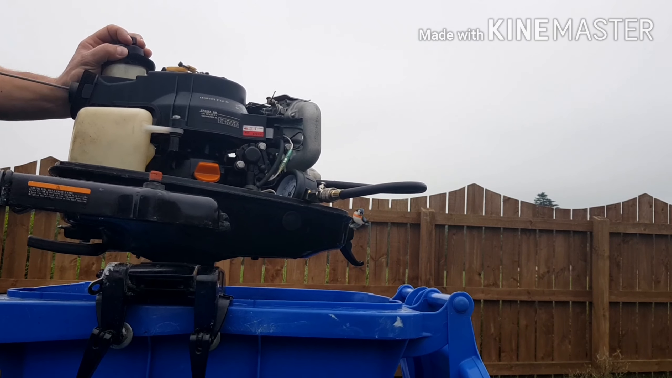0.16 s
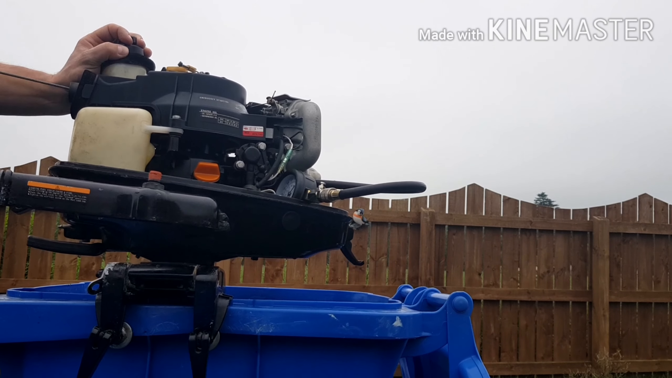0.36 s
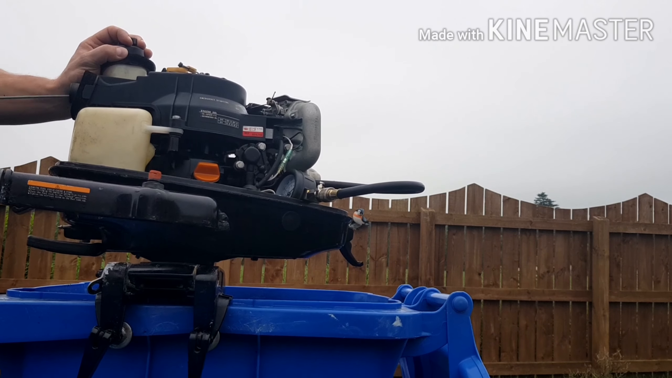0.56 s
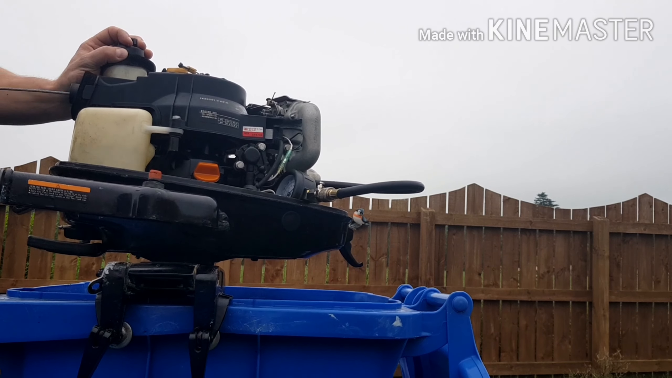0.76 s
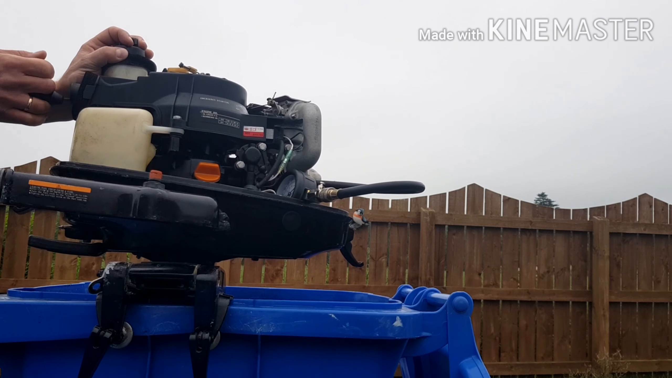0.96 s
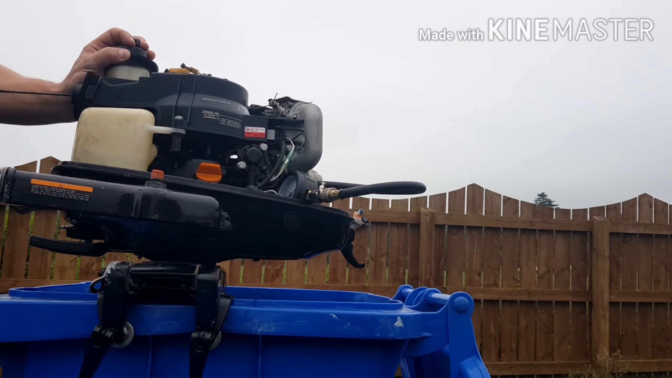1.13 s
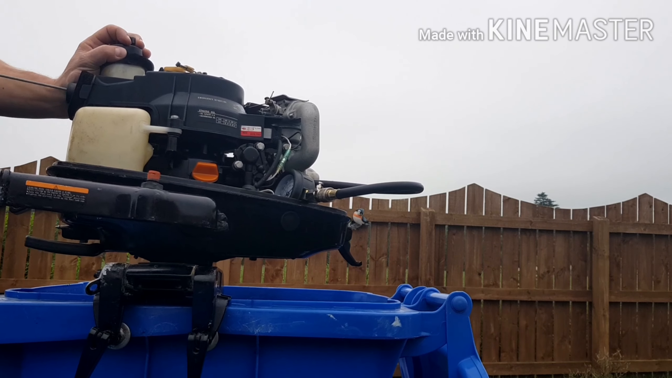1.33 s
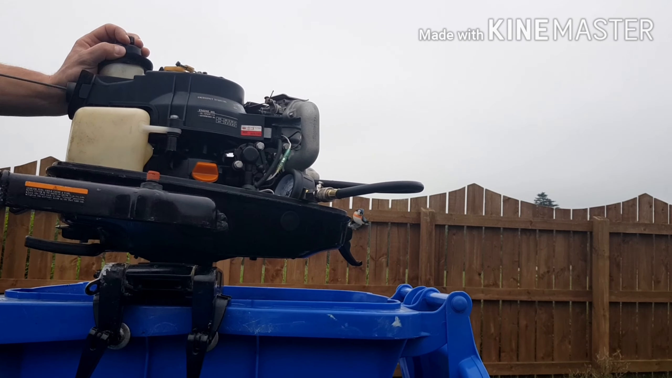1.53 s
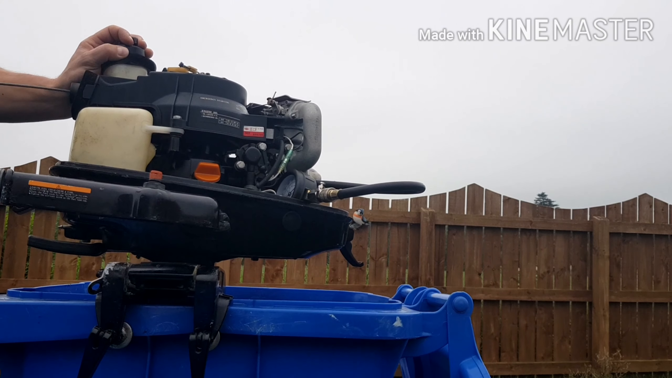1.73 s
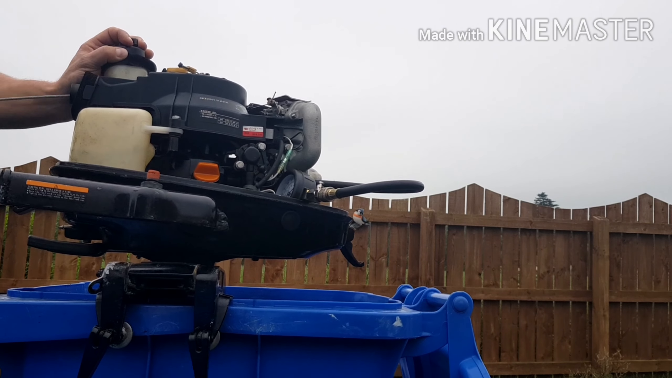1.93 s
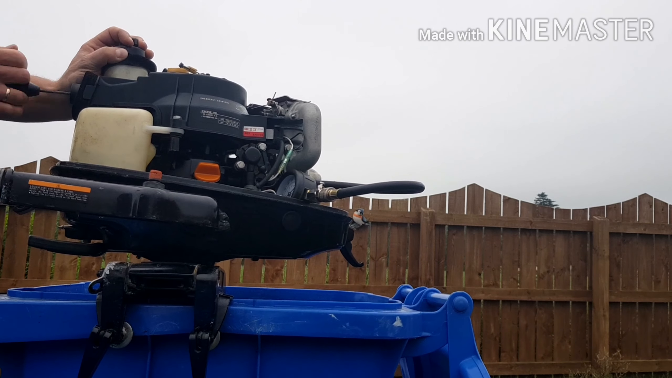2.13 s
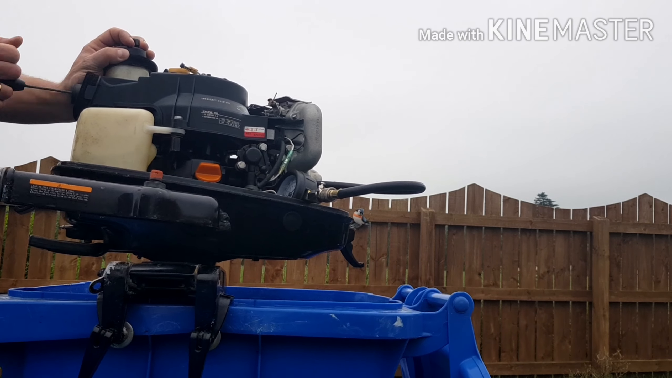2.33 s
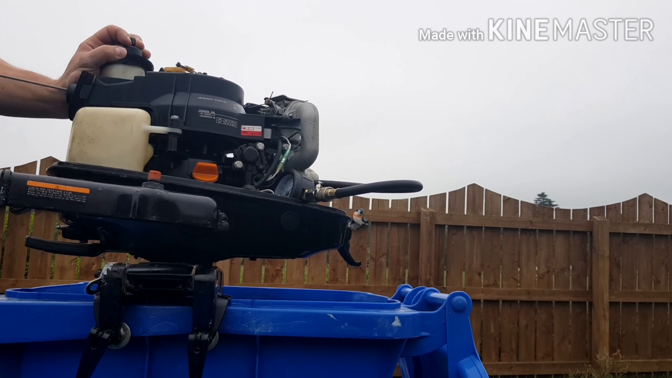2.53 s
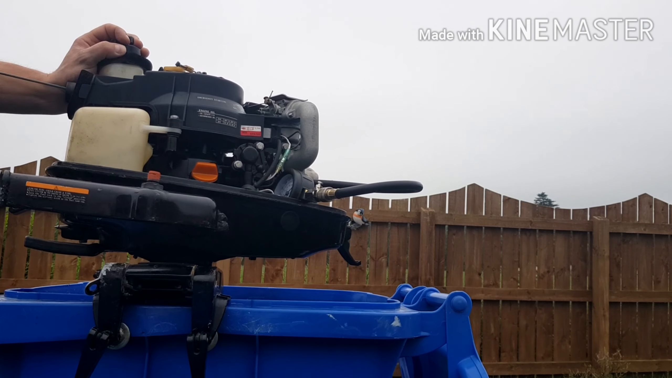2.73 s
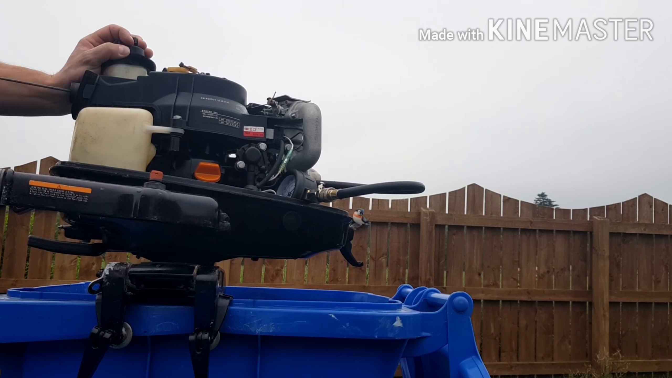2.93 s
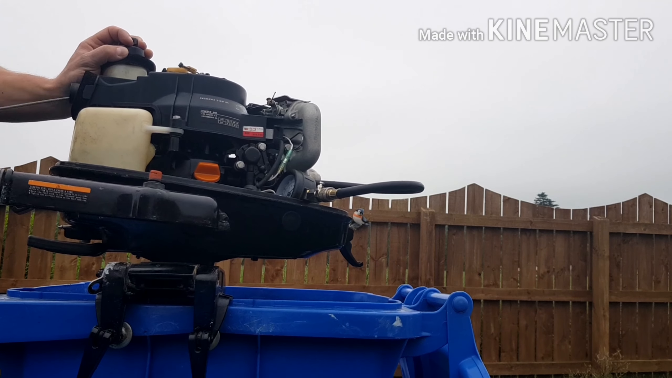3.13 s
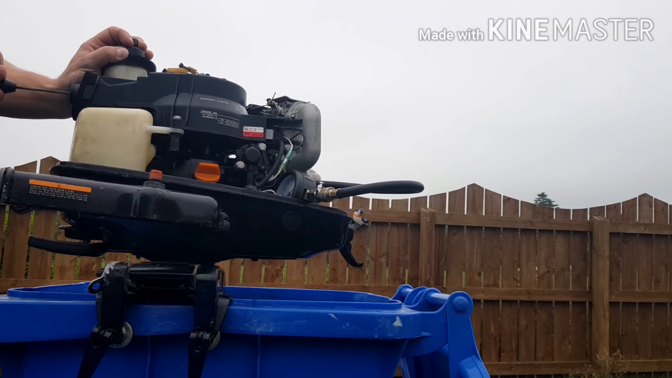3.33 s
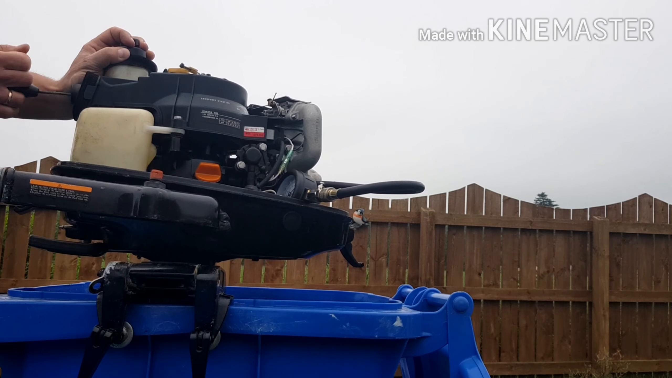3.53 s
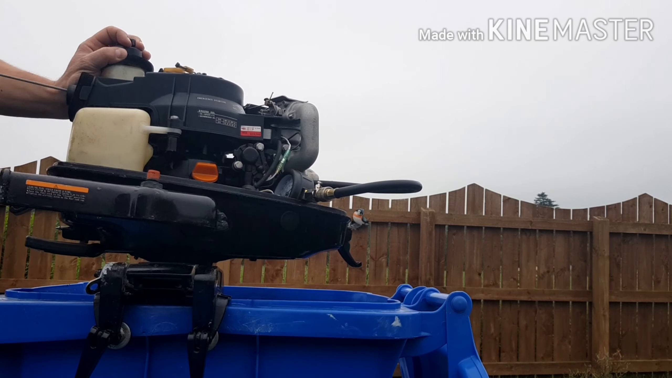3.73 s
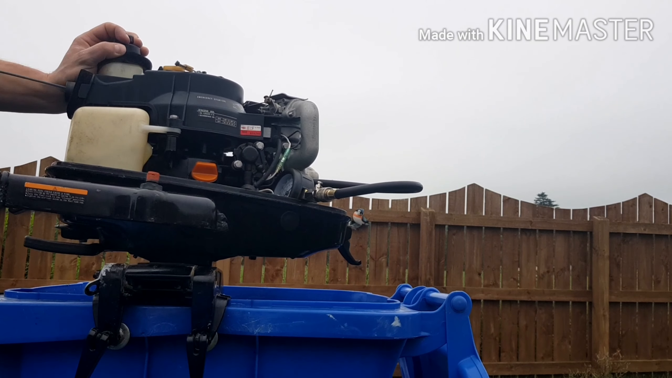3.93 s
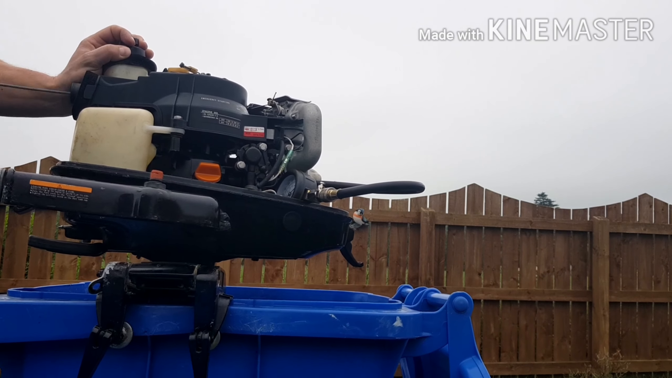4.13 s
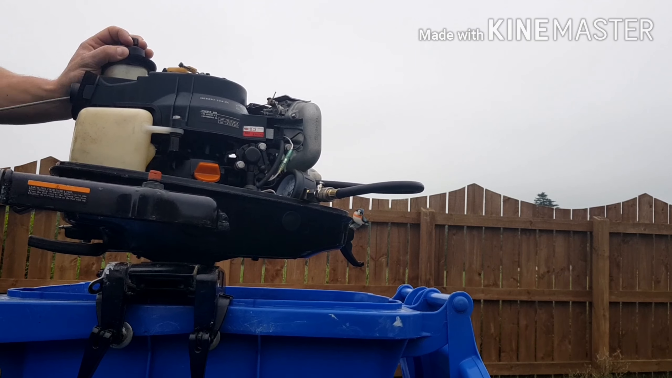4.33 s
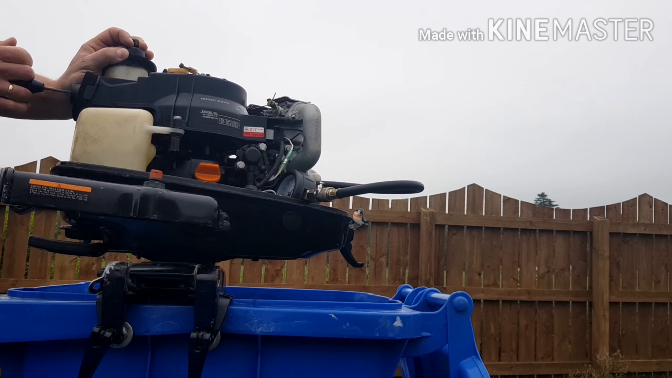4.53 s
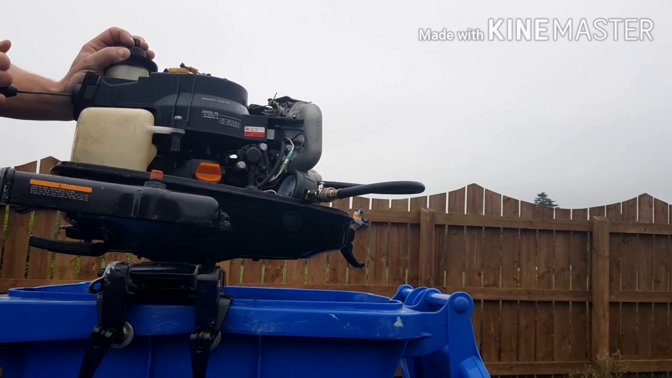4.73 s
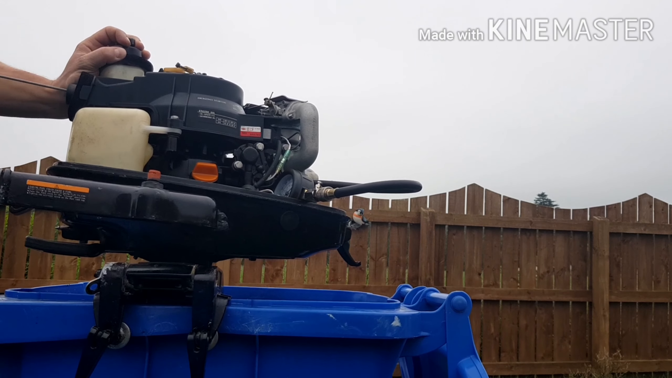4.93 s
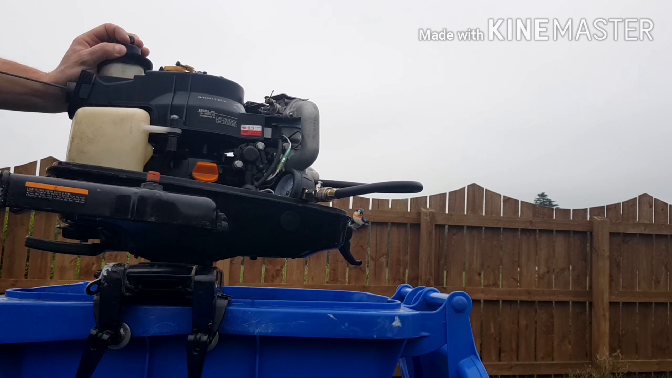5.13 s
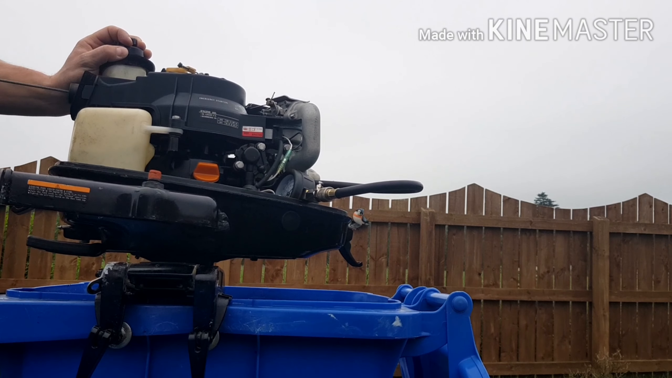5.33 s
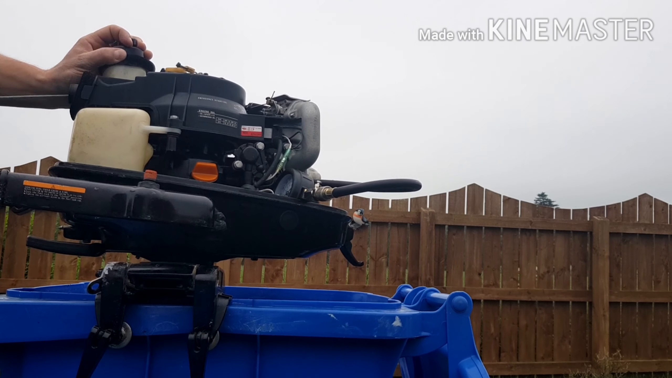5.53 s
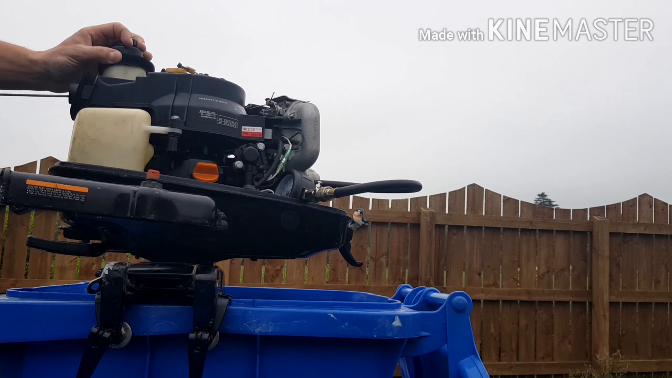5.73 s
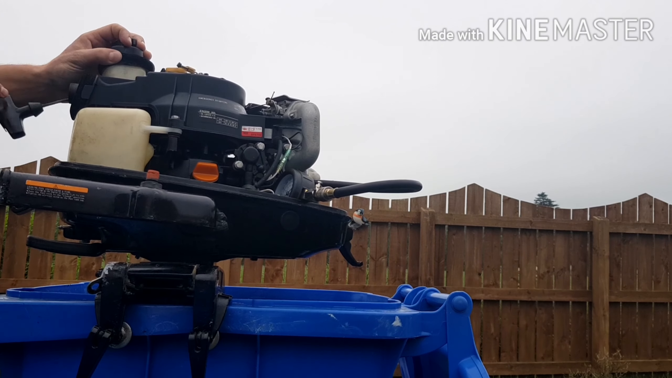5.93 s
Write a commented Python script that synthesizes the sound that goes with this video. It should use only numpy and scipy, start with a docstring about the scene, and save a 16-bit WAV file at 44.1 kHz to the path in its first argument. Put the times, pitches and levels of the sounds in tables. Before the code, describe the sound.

A small outboard engine is yanked over five times by its pull rope, clunking, puffing and rattling in a quiet garden, but never firing.

```python
"""A small outboard on a garden stand, heard close by on two microphone ports: five rope pulls, and it never fires.
In each pull the starter pawls catch with a clunk (dying modes and noise cracks), then the cylinder puffs twice
(falling thumps and air) while the reel rattles in its plastic housing (filtered noise). As the pull ends a
steel part pings (long modes), the rope winds back with a knock, and the reel coasts down. A far bird (gliding
whistles) calls before the fourth and fifth pulls; after the last, the rope slides slowly home (hiss)."""
import sys
import numpy as np
from scipy import signal
from scipy.fft import rfft, irfft
from scipy.io import wavfile
from scipy.ndimage import uniform_filter1d

SR = 44100
rng = np.random.default_rng(int(sys.argv[2]) if len(sys.argv) > 2 else 0)


def put_to_file(sound):
    """Save the sound as 16-bit audio at rate SR, in the file named by the first command-line argument."""
    columns = np.atleast_2d(sound).T  # one column per channel
    safe = np.clip(columns, -1, 1)
    whole_steps = np.round(safe * 32767)
    wavfile.write(sys.argv[1], SR, whole_steps.astype(np.int16))


N = 263714
TIME = np.arange(N) / SR  # [s]

# Event and mode levels are relative: each source sets its own gain.
# garden air around the stand: (frequency [Hz], level [dB])
GARDEN_SPECTRUM = [(20, -12.5), (50, 3.5), (110, -4), (250, -18), (600, -18), (1200, -26), (2500, -20.5),
                   (5000, -30.5), (9000, -40), (15000, -33.5)]
# a distant bird, one list a call: (time [s], pitch [Hz], level [dB])
BIRD_CALLS = [
    [(3.42, 3500, -76), (3.45, 3250, -69), (3.48, 2739, -62), (3.515, 2470, -55), (3.57, 2281, -59)],
    [(4.67, 2480, -93), (4.70, 2516, -68.5), (4.725, 2650, -56), (4.745, 2680, -70)],
]

# likeness of the two microphone ports: (frequency [Hz], likeness [0-1])
PORT_LIKENESS = [(25, .7), (100, 1), (500, 1), (1000, 0.75), (2000, 0.66), (5000, 0.11), (15000, 0.13)]
# left port against right port: (frequency [Hz], level difference [dB])
PORT_LEAN = [(60, 2.9), (400, 1.8), (1200, 3.5), (2400, 2.44), (4400, 1.35), (8000, 1.7), (10600, 7.4),
             (12000, 3.6), (14000, 10.6)]
LEFT_LEAD_MS = .17
BAND_EDGE_HZ = 15800

# resonances of the plastic housing, before the depth factor:
# (frequency [Hz], width [Hz], lift [dB], left-right difference [dB])
HOUSING_RESONANCES = [(638, 54, 12.5, -1), (893, 132, 14, -3.5), (1047, 82, 6, 1.5), (1257, 123, 15, -1.5),
                      (1645, 108, 6.5, 7), (1822, 260, 11.5, -6.5), (2194, 116, 7.5, -2),
                      (2637, 54, 4.5, 9), (3538, 165, 1.5, 13)]
# chatter of the reel: (frequency [Hz], level [dB])
RATTLE_SPECTRUM = [(60, -30.5), (200, 0.5), (330, -3.5), (500, 3.5), (770, -4), (1400, -1), (2200, -6),
                   (3200, -3.5), (4500, -14), (9000, -24.5), (16000, -60.5)]
# drone of the coasting reel through the shell: (frequency [Hz], level [dB])
DRONE_SPECTRUM = [(200, -21.5), (480, -14.5), (620, 2), (690, -2), (780, -20.5), (920, -2), (1150, -12.5),
                  (2500, -41)]
# rope running through its guide: (frequency [Hz], level [dB])
HISS_SPECTRUM = [(800, -26.5), (2500, 2), (4000, -4.5), (6500, -3), (8500, -7), (11000, -6), (15000, -11.5)]
# the engine turning over: (frequency [Hz], level [dB])
RUMBLE_SPECTRUM = [(18, -21.5), (35, -20), (50, -3.5), (80, 3), (115, -3), (165, 0), (230, -5.5),
                   (330, -12), (700, -36), (2000, -65)]
# small metal contacts: (frequency [Hz], level [dB])
CLICK_SPECTRUM = [(100, -24), (500, 3), (1200, -8.5), (2400, -8), (3300, 11), (4000, -1.5), (6000, -0.5),
                  (8000, -2.5), (11000, -6), (15000, -15.5)]
# metallic cracks and spits of air: (frequency [Hz], level [dB])
CRACK_SPECTRUM = [(100, -18.5), (400, 2), (1100, 9), (2000, -2), (2500, -10), (3300, -3.5), (4300, -11),
                  (5800, -4), (8000, -15.5), (15000, -28.5)]
# the bin under the motor, shuddering after each catch: (frequency [Hz], level [dB])
SHUDDER_SPECTRUM = [(40, -16), (80, -2), (180, -8.5), (250, 6), (330, -6), (480, 0.5), (800, -34.5),
                    (2000, -58)]

# the pawls catch the flywheel:
# (time [s], level [dB], metallic crack against the body [dB], hardness as mode tilt [dB per octave])
PAWL_CATCHES = [(.025, -7, -8, 1), (1.2289, -12, -8.5, -0.5), (2.4202, -14.5, -10, -2),
                (3.634, -11.5, -6.5, -1), (4.802, -12, -10, -1)]
# the reel knocks, mostly as the rope goes slack: (time [s], level [dB])
REEL_KNOCKS = [(0.492, -15), (1.73, -15), (2.573, -16), (2.945, -16), (4.128, -14), (5.21, -19.5),
               (5.317, -14.5)]
# further clicks, as slack is taken up, in the fifth stroke and after rock-backs:
# (time [s], level [dB], treble tilt [dB per octave])
FURTHER_CLICKS = [(0.9665, -39.5, -5.5), (1.1273, -32.5, -5.5), (2.1901, -38, -3.5), (2.3534, -29.5, -5),
                  (3.417, -37.5, -4.5), (3.573, -27.5, -5), (4.745, -41, -2), (4.976, -19, -1),
                  (5.0614, -19, 3), (5.0688, -11.5, 2)]
# a steel part of the starter is struck:
# (time [s], level [dB], gain of the long note [dB], gain of modes above 9 kHz [dB])
STEEL_STRIKES = [(.4197, -18.5, -8.5, -3.5), (1.1663, -35, -4, -14), (1.1874, -26.5, -26, -11),
                 (1.6499, -25.5, -.5, 0), (2.4101, -36, -13, -3.5), (2.8756, -24.5, 4, 5),
                 (3.6195, -31.5, -6.5, -8), (4.0616, -23.5, -1.5, 2)]
# the rope slides slowly home after the last pull: (time [s], level [dB])
ROPE_SLIDE = [(5.75, -84), (5.8, -58), (5.87, -53.5), (5.9, -61.5), (5.98, -59)]

STEEL_NOTE_HZ = 3128.0
# modes of the steel part, decay before damping:
# (frequency [Hz], level [dB], t60 [s], phase lead of the left port [rad])
STEEL_MODES = [(2205, -14, 0.5, -0.5), (STEEL_NOTE_HZ, -5, 1.01, -1.5), (6204.5, -3, 0.18, 2.5),
               (6278, 3, 0.0943, 2.5), (6666, -0.5, 0.0867, -2), (6697, -0.5, 0.18, 2.1),
               (6777, -6.5, 0.19, 1), (6996.5, -9, 0.09, -2.5), (8239, -7.5, .1, -4.5),
               (8615.5, -8.5, 0.15, 0.5), (8771, -11.5, 0.06, 2), (10446, -9.5, 0.28, -1.5),
               (10548.5, -1, 0.2259, 0.74), (10605, -3, 0.13, 3.5), (13397.5, -3, .1, -1.5),
               (13427, -8, 0.23, 3.5), (13630, -10.5, 0.05, 2.5), (15130, -11, -0.05, -1)]
# modes of the whole motor on its bracket: (frequency [Hz], level [dB], t60 [s])
MOTOR_MODES = [(113, -28, 0.079), (268.6, -5.5, 0.12), (418.6, -12.5, 0.16), (542, -17.5, 0.076),
               (615, -3.5, 0.082), (676, -6.5, 0.11), (874, -15, 0.18), (922, 0.5, 0.054),
               (1052, -4.5, 0.085), (1130, -16, 0.02), (1543, -13.5, 0.071), (1700, -9, 0.066),
               (2180, -13.5, 0.1)]
# modes of the rope reel: (frequency [Hz], level [dB], t60 [s])
REEL_MODES = [(560, -13, 0.02), (625, 3.5, 0.041), (700, -16.5, 0.085), (965, -3, 0.033), (1260, -6, 0.019),
              (1850, -3.5, 0.028)]

# one row a pull: (engine breaks free [s], flywheel whips round [s], coasting reel first bumps [s],
# engine rocks back [s], reel stops [s], effort [dB], jolt on breaking free [dB], yank on the rope [dB],
# rock-back click [dB], rock-back shudder [dB])
PULL_ROWS = [(.096, 0.1612, 0.58, 0.76, 0.92, -.6, -16.5, -56, -23, -54),
             (1.3143, 1.3883, 1.7, 2.0117, 2.26, -0.87, -21, -54, -25.5, -54),
             (2.548, 2.6147, 2.99, 3.2273, 3.43, 0.25, -18, -52.5, -20, -49.5),
             (3.733, 3.799, 4.213, 4.4059, 4.632, 0.5, -19.5, -55, -16.5, -47),
             (4.92, 4.9842, 5.383, 5.6351, 5.85, 0.3, -31.5, -45, -22.5, -53)]
# every stroke turns the same gears, so its sounds keep their places around the whip of the flywheel
# pawls and valve gear click: (time from the whip [s], level [dB], treble tilt [dB per octave])
GEAR_CLICKS = [(-.0085, -21.5, -0.5), (0, -12.5, 0.7), (.087, -23.5, 1.5), (.107, -29, 1)]
# the reel bumps its housing: (time from the whip [s], level [dB])
GEAR_BUMPS = [(.044, -21.5), (.087, -22), (.14, -28), (.224, -20.5), (.252, -21)]
# the cylinder lets go of its compressed air: (time from the whip [s], level [dB])
CYLINDER_PUFFS = [(.0425, -24.5), (.2, -22.5)]

# the steel part is also grazed just before each catch (dB against the catch) and late in each stroke
GRAZE_LEAD_S, GRAZE_CATCH_DB = 0.021, -20.5
GRAZE_STROKE_S, GRAZE_STROKE_DB = .2255, -30.5
GRAZE_NOTE_DB, GRAZE_TOP_DB = -17, -12.5
# relative levels at a speed of 1 (full load for the rumble), and the power by which each grows
RATTLE_DB, RATTLE_POWER = -37, 1.88
ROPE_DB, ROPE_POWER = -58, 0.71
RUMBLE_DB, RUMBLE_POWER = -40.5, 1.25
# the rope hisses most at the yank and again as it runs out, timed from the whip
YANK_S, YANK_WIDTH_S = 0.024, 0.042
RUN_OUT_S, RUN_OUT_WIDTH_S, RUN_OUT_DB = 0.29, 0.041, -55.5
# the last compression throws the engine back: a click, a bump of the reel and a shudder
ROCK_TILT_DB, ROCK_BUMP_S, ROCK_BUMP_DB = 0.5, .004, -24.5
ROCK_SHUDDER_S, ROCK_WIDTH_S = .05, 0.058
# as the engine breaks free the reel jolts, and a pawl clicks just after
FREE_CLICK_S, FREE_CLICK_DB, FREE_TILT_DB = .008, -18, -1
# the reel creeps as the slack is taken up, strains against compression, spins up, holds and coasts to a stop
TAKE_UP_S, SPIN_UP_S, HOLD_S = .14, .07, 0.16
# reel speeds, before each pull's effort: between pulls, on the slack, against compression, at the rock-back
IDLE_SPEED, CREEP_SPEED, STRAIN_SPEED, ROCK_SPEED = 0.03, 0.1, 0.34, 0.48
# coasting, the reel wobbles and bumps a few times, each time sooner and softer
WOBBLE_COUNT, WOBBLE_DB, WOBBLE_FADE_DB = 3, -22.5, -0.5
WOBBLE_GAP_S, WOBBLE_POWER = .054, .77


def amp(db):
    """Decibels to gain."""
    return 10 ** (np.asarray(db) / 20)


def unit(x):
    """Scales to rms 1."""
    return x / np.sqrt(np.mean(x ** 2) + 1e-20)


def read(points, hz):
    """Reads a table of (frequency [Hz], value) on a log-frequency axis."""
    f, value = np.transpose(points)
    return np.interp(np.log(hz + 1), np.log(f), value)


def add(mix, s, sound):
    """Mixes a two-row sound in at time s."""
    part = mix[:, max(round(s * SR), 0):][:, :sound.shape[1]]
    part += sound[:, :part.shape[1]]


def ticks(seconds):
    """A time axis in seconds."""
    return np.arange(int(seconds * SR)) / SR


def swell(s, width_s):
    """A smooth rise and fall around time s."""
    return np.exp(-.5 * ((TIME - s) / width_s) ** 2)


def colour(x, db_of_hz):
    """Causal (minimum-phase) filter with the given gain curve, built by folding its cepstrum."""
    size = 4096
    cepstrum = irfft(np.log(amp(db_of_hz(np.fft.rfftfreq(size, 1 / SR)))))
    cepstrum[1:size // 2] *= 2
    cepstrum[size // 2 + 1:] = 0
    impulse = irfft(np.exp(rfft(cepstrum)))[None, :size // 2]
    return signal.fftconvolve(x, impulse, axes=1)[:, :x.shape[1]]


def noise(spectrum, count=N):
    """Two unrelated rows of coloured noise: direct and scattered sound."""
    return unit(colour(rng.standard_normal((2, count)), lambda hz: read(spectrum, hz)))


def ring(modes, t, scatter):
    """Dying modes; the scattered row meets each a little out of phase."""
    phase = rng.normal(0, scatter, (len(modes), 2, 1)) * [[0], [1]]
    out = 0
    for k, (hz, db, t60) in enumerate(modes):
        out = out + (-1) ** k * amp(db - 60 * t / t60) * np.sin(2 * np.pi * hz * t + phase[k])
    return out


def burst(t, rise, t60, tail_db, tail_t60):
    """Envelope of a blow: a quick rise, a fast fall and a weaker tail (times in seconds)."""
    return (1 - np.exp(-t / rise)) * (amp(-60 * t / t60) + amp(tail_db - 60 * t / tail_t60))


def ports(x, lead_ms=LEFT_LEAD_MS):
    """Direct and scattered sound become the two microphone ports; the left port is nearer."""
    hz = np.fft.rfftfreq(N, 1 / SR)
    direct, scattered = rfft(x)
    like = np.clip(read(PORT_LIKENESS, hz), 0, 1)
    lean = amp(read(PORT_LEAN, hz) / 2)
    delay = np.exp(-2j * np.pi * hz * lead_ms / 10 ** 3)
    right = (like * direct + np.sqrt(1 - like ** 2) * scattered) * delay
    return irfft(np.array([direct * lean, right / lean]), N)


def garden():
    """The quiet garden is steady coloured noise on both ports."""
    return amp(-58.5) * ports(noise(GARDEN_SPECTRUM))


def bird():
    """Thin gliding whistles; a random flutter of their level blurs them with distance."""
    out = np.zeros((2, N))
    for call in BIRD_CALLS:
        s, hz, db = np.transpose(call)
        t = np.arange(s[0], s[-1], 1 / SR)
        blur = unit(uniform_filter1d(rng.standard_normal((2, len(t))), size=300, axis=1))
        whistle = np.sin(2 * np.pi * np.cumsum(np.interp(t, s, hz)) / SR)
        add(out, s[0], amp(np.interp(t, s, db)) * blur * whistle)
    return out


def fence(x, t60=0.35, wet_db=-19):
    """A thin, short scatter of sparse random echoes comes back from fence and ground."""
    t = ticks(.4)
    taps = rng.standard_normal((2, len(t)))
    taps *= rng.random((2, len(t))) < 2000 / SR  # about 2000 echoes a second
    taps *= (t > .008) * amp(-60 * t / t60)
    return amp(wet_db) * signal.fftconvolve(x, taps / np.linalg.norm(taps[0]), axes=1)[:, :N]


def housing(x, depth):
    """The plastic shell lifts its resonances, each radiating more to one side."""
    def resonances(hz, column):
        return depth * sum(row[column] / (1 + (2 * (hz - row[0]) / row[1]) ** 2) for row in HOUSING_RESONANCES)
    lean_db = resonances(np.fft.rfftfreq(N, 1 / SR), 3)
    lifted = colour(x, lambda hz: resonances(hz, 2))
    return irfft(rfft(lifted) * amp(np.array([lean_db, -lean_db]) / 2), N)


def strokes(pattern):
    """Repeats a pattern of (time from the whip [s], level [dB], ...) in every pull, louder with more effort."""
    return [(whip + s, db + effort_db, *rest)
            for _, whip, _, _, _, effort_db, *_ in PULL_ROWS for s, db, *rest in pattern]


def turning():
    """Gains of housing rattle, rope hiss and engine rumble, from the speed, rope and load of each pull."""
    speed, rope, rumble = IDLE_SPEED, 0, 0
    for (catch, *_), pull in zip(PAWL_CATCHES, PULL_ROWS):
        free, whip, _, rock, stop, effort_db, _, yank_db, _, shudder_db = pull
        spin = np.interp(TIME, [catch - TAKE_UP_S, catch, free, free + SPIN_UP_S, whip + HOLD_S, rock, stop],
                         [CREEP_SPEED, 2 * CREEP_SPEED, STRAIN_SPEED, 1, 1, ROCK_SPEED, 0], left=0)
        speed = speed + spin * amp(effort_db / RATTLE_POWER)
        rope += amp(yank_db) * swell(whip + YANK_S, YANK_WIDTH_S)
        rope += amp(RUN_OUT_DB) * swell(whip + RUN_OUT_S, RUN_OUT_WIDTH_S)
        # the engine is under full load from the moment the pawls catch
        load = np.interp(TIME, [catch, whip + HOLD_S, stop], [1, 1, 0], left=0)
        rumble += amp(RUMBLE_DB + effort_db) * load ** RUMBLE_POWER
        rumble += amp(shudder_db) * swell(rock + ROCK_SHUDDER_S, ROCK_WIDTH_S)
    return amp(RATTLE_DB) * speed ** RATTLE_POWER, rope + amp(ROPE_DB) * speed ** ROPE_POWER, rumble


def cylinder(rumble, start_hz=230, end_hz=45, sag_s=.012):
    """The engine rumbles as it turns; each compression ends in a falling thump and a spit of air."""
    out, t = amp(-3.5) * rumble * noise(RUMBLE_SPECTRUM), ticks(0.048)
    pitch = end_hz + (start_hz - end_hz) * np.exp(-t / sag_s)
    thump = np.sin(2 * np.pi * np.cumsum(pitch) / SR)
    thump *= burst(t, rise=0.0014, t60=0.034, tail_db=-26.5, tail_t60=.16)
    for s, db in strokes(CYLINDER_PUFFS):
        air = amp(-6) * burst(t, rise=0.0025, t60=0.055, tail_db=-16.5, tail_t60=0.094)
        air = air * noise(CRACK_SPECTRUM, count=len(t))
        add(out, s, amp(db) * (thump + air))
    return ports(out)


def click_list():
    """Every click: through the stroke, the further ones, on breaking free and on rocking back."""
    rows = strokes(GEAR_CLICKS) + FURTHER_CLICKS
    for free, _, _, rock, *_, rock_db, _ in PULL_ROWS:
        rows += [(free + FREE_CLICK_S, FREE_CLICK_DB, FREE_TILT_DB), (rock, rock_db, ROCK_TILT_DB)]
    return rows


def clicks():
    """Hard little metal contacts are short noise bursts, heard through the housing."""
    out, t = np.zeros((2, N)), ticks(.1)
    for s, db, tilt_db in click_list():
        grain = noise(CLICK_SPECTRUM, count=len(t))
        # the tilt works above 1 kHz
        snap = unit(colour(grain, lambda hz: tilt_db * np.log2(np.maximum(hz, 1000) / 5000)))
        add(out, s, amp(db - 5) * burst(t, rise=0.00016, t60=0.014, tail_db=-11.5, tail_t60=0.091) * snap)
    return housing(ports(out), depth=0.86)


def strike_list():
    """Every touch on the steel part: strikes, grazes before the catches and grazes late in the strokes."""
    grazes = [(s - GRAZE_LEAD_S, db + GRAZE_CATCH_DB) for s, db, *_ in PAWL_CATCHES]
    grazes += strokes([(GRAZE_STROKE_S, GRAZE_STROKE_DB)])
    return STEEL_STRIKES + [(s, db, GRAZE_NOTE_DB, GRAZE_TOP_DB) for s, db in grazes]


def pings(buzz=0.61, buzz_t60=0.25, damping=0.42, swing=0.23, swing_per_s=9, bloom=0.0098):
    """A hard strike rings free; a light touch stays on the steel and damps its modes."""
    out, t = np.zeros((2, N)), ticks(1.1)
    contact, brief = np.zeros((2, N)), ticks(0.062)
    for s, db, note_db, top_db in strike_list():
        # the part buzzes on its seat at first, and its ring swells and fades as it turns
        shake = unit(uniform_filter1d(rng.standard_normal((2, len(t))), size=40, axis=1))
        loose = 1 + buzz * amp(-60 * t / buzz_t60) * shake
        loose *= 1 + swing * np.cos(2 * np.pi * swing_per_s * t * rng.uniform(0.64, 1.6))
        for hz, level, t60, lead in STEEL_MODES:
            level += note_db * (hz == STEEL_NOTE_HZ) + top_db * (hz > 9000)
            t60 *= amp(damping * min(db + 23, 0))
            u = t[t < t60]
            sides = amp(read(PORT_LEAN, hz) * np.array([[.5], [-.5]]))
            # long modes take longer to bloom
            envelope = (1 - np.exp(-u / (bloom * t60))) * amp(level - 60 * u / t60)
            mode = envelope * np.sin(2 * np.pi * hz * u - [[0], [lead]])
            add(out, s, amp(db - 4.0) * sides * mode * loose[:, :len(u)])
        touch = burst(brief, rise=0.0022, t60=0.05, tail_db=-20.5, tail_t60=0.074)
        add(contact, s, amp(db - 5) * touch * noise(CLICK_SPECTRUM, count=len(brief)))
    return out + ports(contact)


def bump_list():
    """Every bump of the reel: through the stroke, on breaking free, while coasting and on rocking back."""
    rows = strokes(GEAR_BUMPS)
    for free, _, coast, rock, _, effort_db, jolt_db, *_ in PULL_ROWS:
        rows += [(free, jolt_db), (rock + ROCK_BUMP_S, ROCK_BUMP_DB)]
        for k in range(WOBBLE_COUNT):
            wobble_s = coast + WOBBLE_GAP_S * k ** WOBBLE_POWER
            rows.append((wobble_s, WOBBLE_DB + effort_db + WOBBLE_FADE_DB * k))
    return rows


def chatter(per_s, spread_db, fall, steady):
    """Envelope of many small, uneven contacts (each dying over fall seconds) over a steady rub."""
    strength = amp(spread_db * np.minimum(rng.exponential(1, N), 3))
    taps = (rng.random(N) < per_s / SR) * strength
    return unit(steady + unit(signal.lfilter([1], [1, -np.exp(-1 / (fall * SR))], taps)))


def reel(rattle, hiss, drone_follow=0.57):
    """The spinning reel chatters and bumps in its housing while the rope hisses through its guide."""
    contacts = chatter(per_s=280, spread_db=5.0, fall=0.0039, steady=0.62)
    out = amp(-3.5) * rattle * contacts * noise(RATTLE_SPECTRUM)
    rope = amp(3.5) * hiss + amp(np.interp(TIME, *np.transpose(ROPE_SLIDE), left=-200))
    out += rope * unit(1.2 + contacts) * noise(HISS_SPECTRUM)
    t = ticks(.08)
    for s, db in bump_list():
        bump = burst(t, rise=0.0011, t60=0.035, tail_db=-13.0, tail_t60=0.16)
        add(out, s, amp(db - 9.5) * bump * noise(RATTLE_SPECTRUM, count=len(t)))
    # gentle contacts are duller, so the low drone outlasts the chatter as the reel slows
    rub = chatter(per_s=140, spread_db=1.5, fall=0.0065, steady=0.63)
    drone = amp(-18.5) * rattle ** drone_follow * rub * noise(DRONE_SPECTRUM)
    return housing(ports(out), depth=0.94) + ports(drone)


def blows(second_pawl_s=0.0076, second_pawl_db=-9):
    """The pawls bite one after the other and set the motor's modes ringing; the reel's knocks ring its own."""
    out, t = np.zeros((2, N)), ticks(.2)
    for s, db, crack_db, tilt_db in PAWL_CATCHES:
        modes = [(hz, level + tilt_db * np.log2(hz / 600), t60) for hz, level, t60 in MOTOR_MODES]
        add(out, s, amp(db - 5.5) * ring(modes, t, scatter=0.93) * (1 - np.exp(-t / 0.00085)))
        shudder = amp(db - 20.5 - 60 * t / 0.29) * (1 - np.exp(-t / 0.0028))
        add(out, s, shudder * noise(SHUDDER_SPECTRUM, count=len(t)))
        for delay, pawl_db in [(0, 0), (second_pawl_s, second_pawl_db)]:
            crack = burst(t, rise=0.000188, t60=0.033, tail_db=-16.5, tail_t60=0.23)
            crack = crack * noise(CRACK_SPECTRUM, count=len(t))
            add(out, s + delay, amp(db + crack_db + pawl_db + 2) * crack)
    for s, db in REEL_KNOCKS:
        add(out, s, amp(db - 3.5) * ring(REEL_MODES, t, scatter=0.43) * (1 - np.exp(-t / 0.00074)))
        rattle = burst(t, rise=0.00094, t60=0.049, tail_db=-14.5, tail_t60=0.069)
        add(out, s, amp(db - 15) * rattle * noise(RATTLE_SPECTRUM, count=len(t)))
    return ports(out)


def scene():
    """The motor close by, the quiet garden around it."""
    rattle, rope, rumble = turning()
    motor = cylinder(rumble) + clicks() + pings() + reel(rattle, rope) + blows()
    return garden() + bird() + fence(motor) + motor


def record(dry):
    """The recorder's band limit: a steep low-pass."""
    lowpass = signal.firwin(255, BAND_EDGE_HZ, window=("kaiser", 9), fs=SR)
    return signal.oaconvolve(dry, lowpass[None], "same")


dry = scene()
out = record(dry)
put_to_file(out)
```